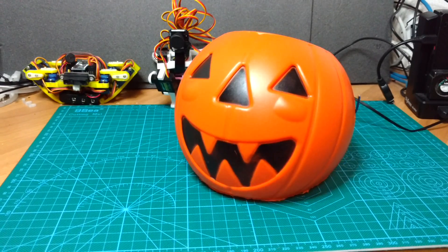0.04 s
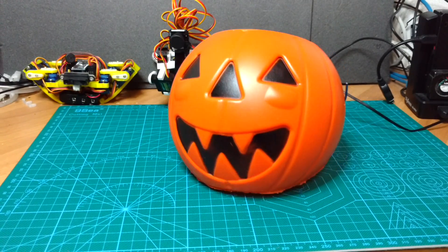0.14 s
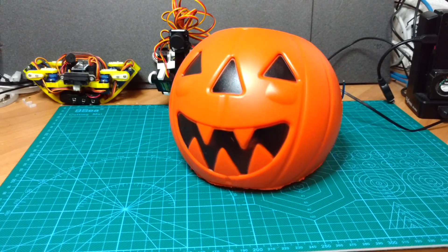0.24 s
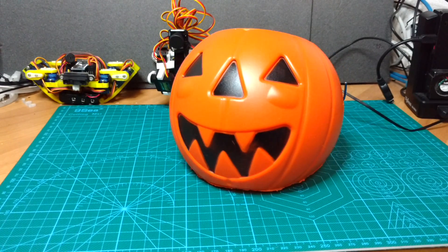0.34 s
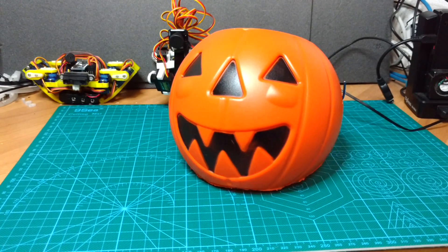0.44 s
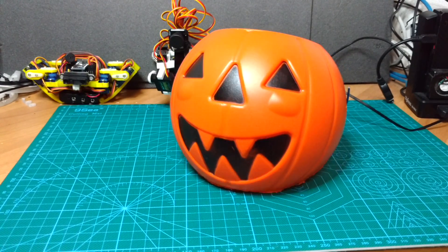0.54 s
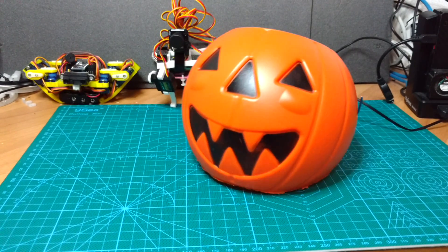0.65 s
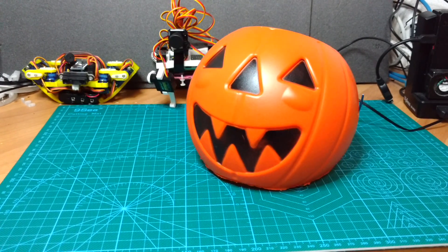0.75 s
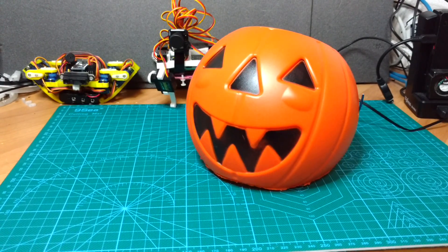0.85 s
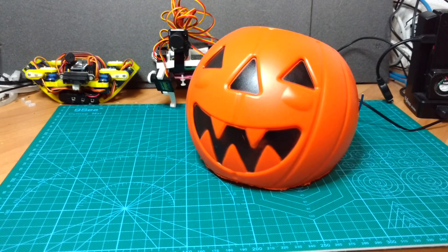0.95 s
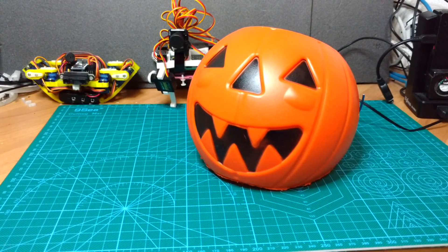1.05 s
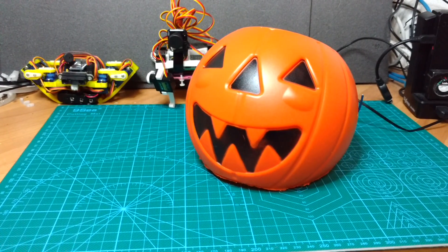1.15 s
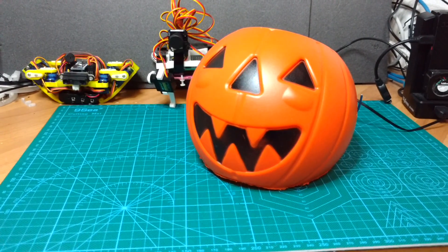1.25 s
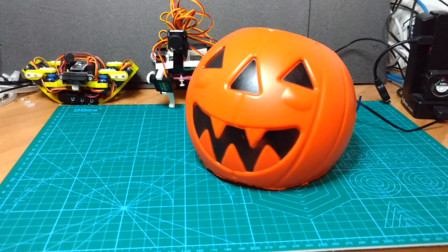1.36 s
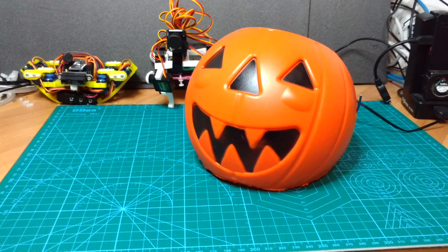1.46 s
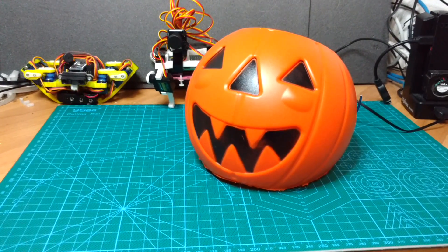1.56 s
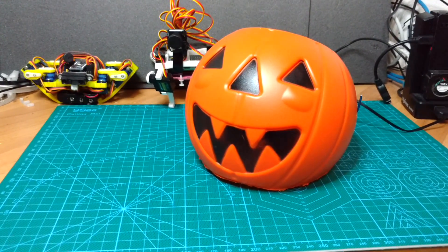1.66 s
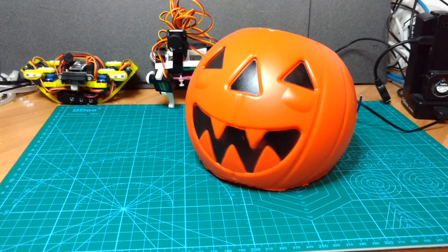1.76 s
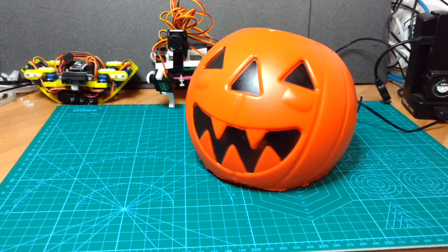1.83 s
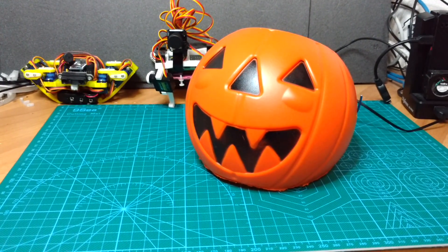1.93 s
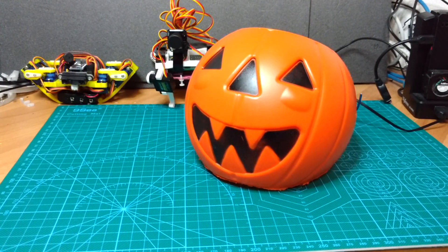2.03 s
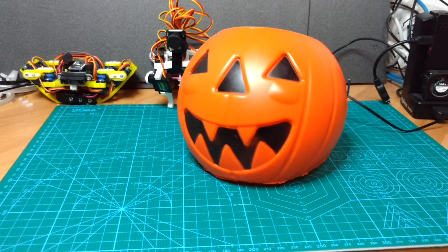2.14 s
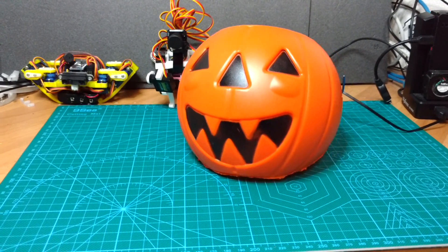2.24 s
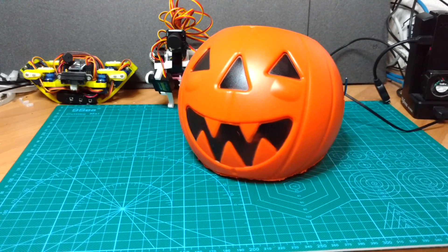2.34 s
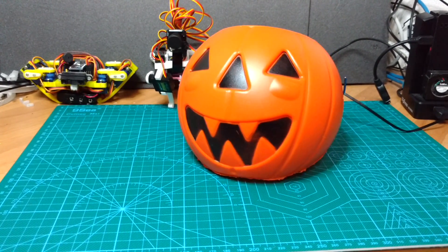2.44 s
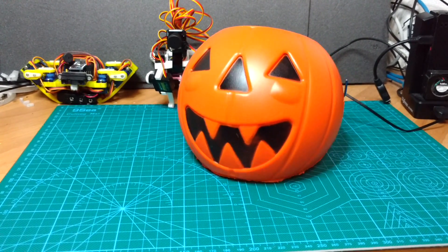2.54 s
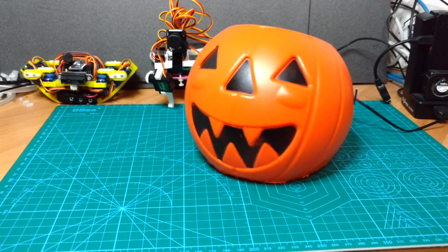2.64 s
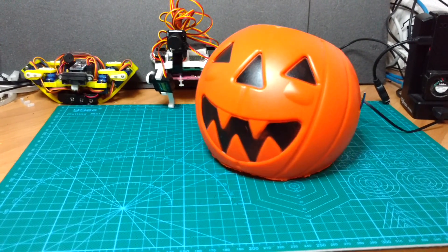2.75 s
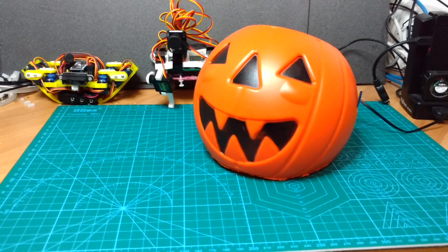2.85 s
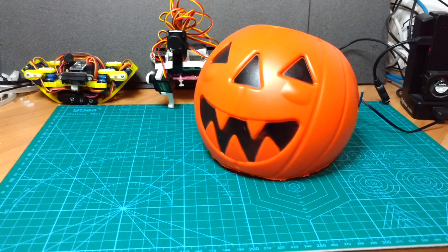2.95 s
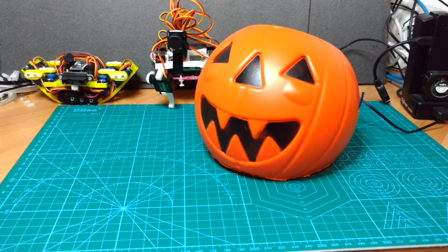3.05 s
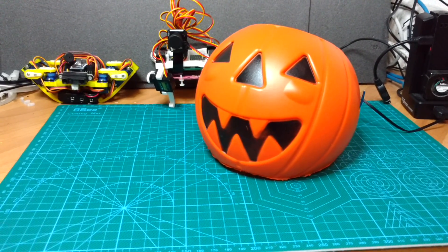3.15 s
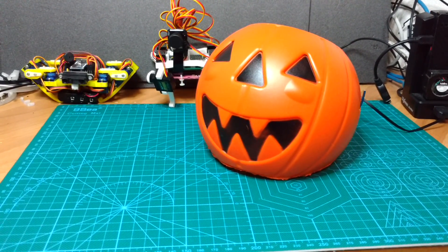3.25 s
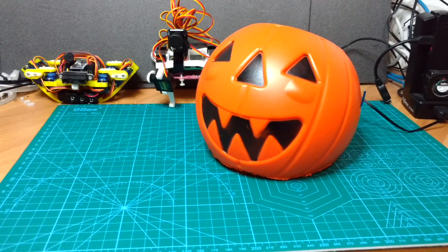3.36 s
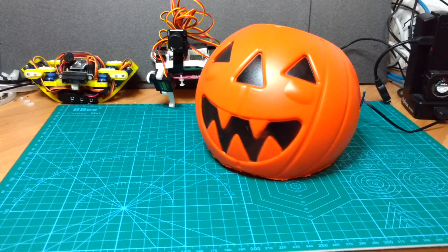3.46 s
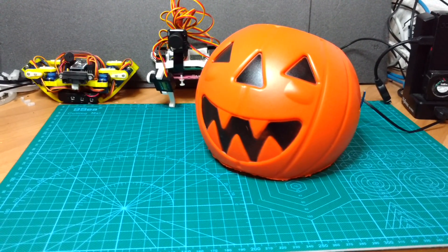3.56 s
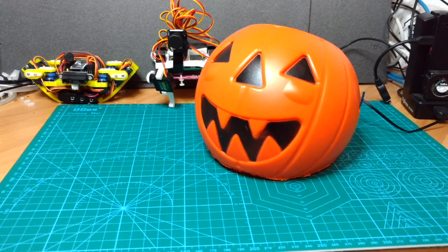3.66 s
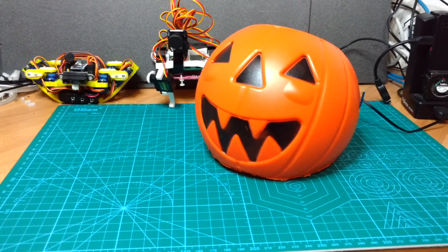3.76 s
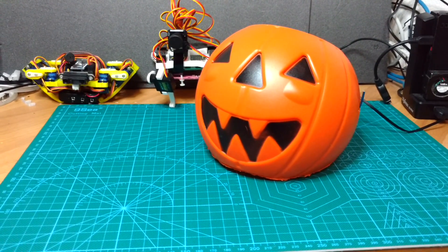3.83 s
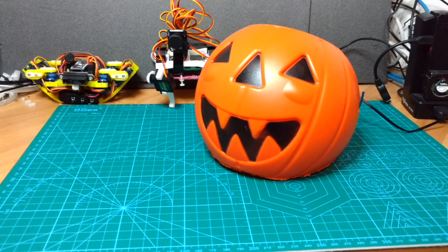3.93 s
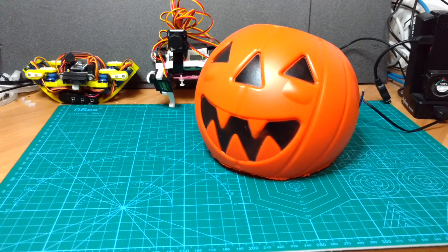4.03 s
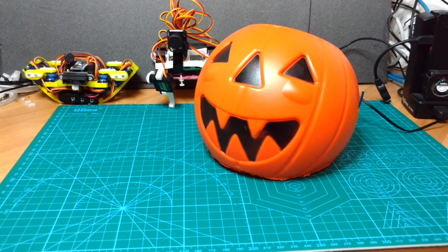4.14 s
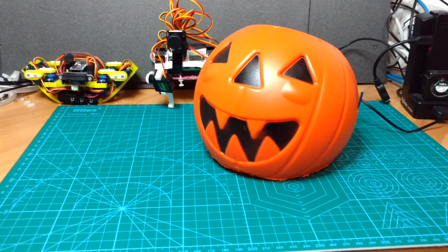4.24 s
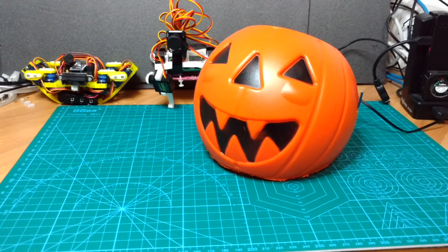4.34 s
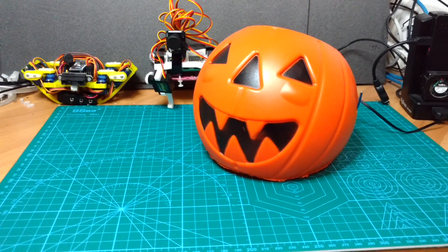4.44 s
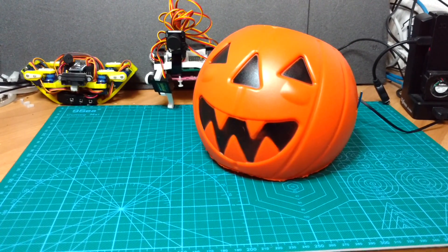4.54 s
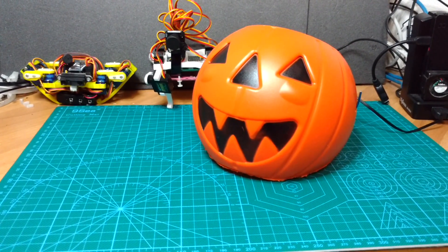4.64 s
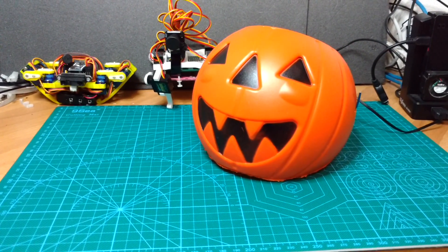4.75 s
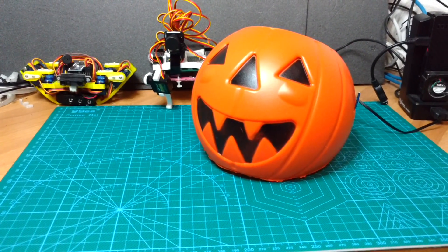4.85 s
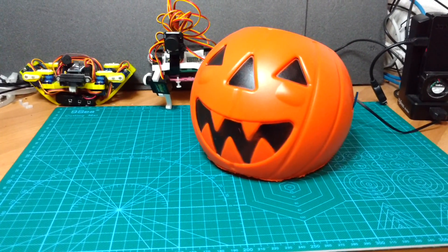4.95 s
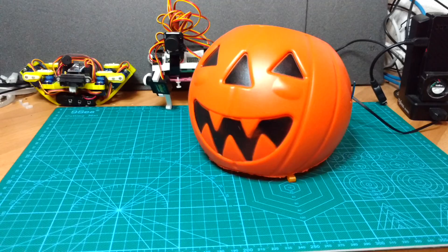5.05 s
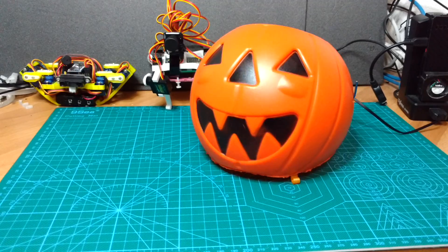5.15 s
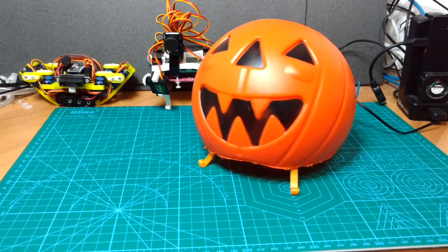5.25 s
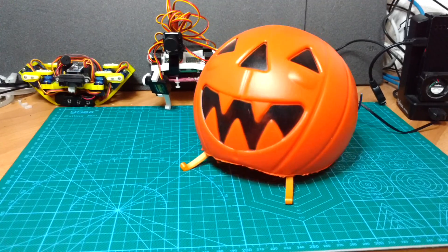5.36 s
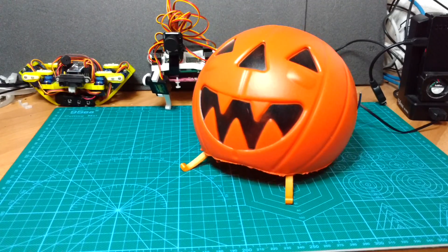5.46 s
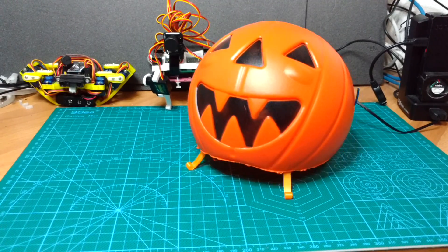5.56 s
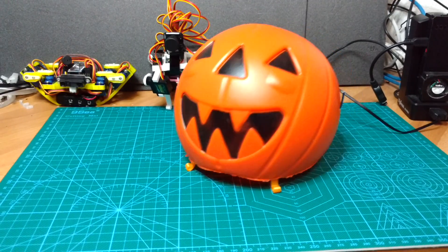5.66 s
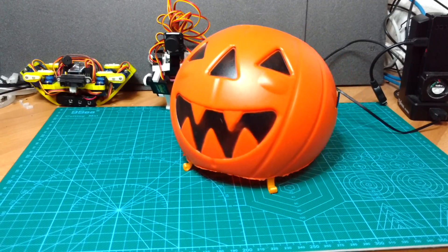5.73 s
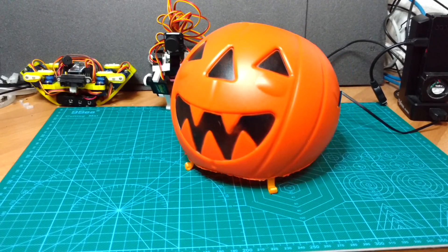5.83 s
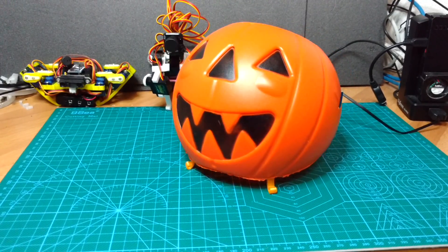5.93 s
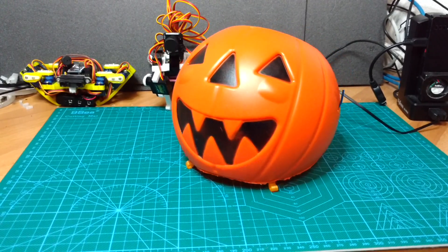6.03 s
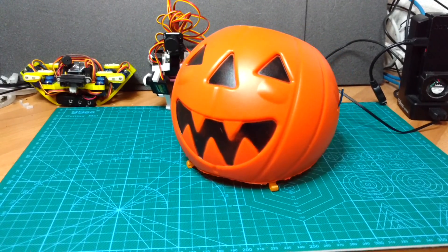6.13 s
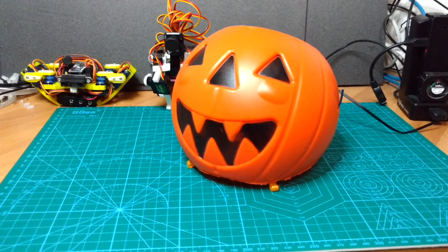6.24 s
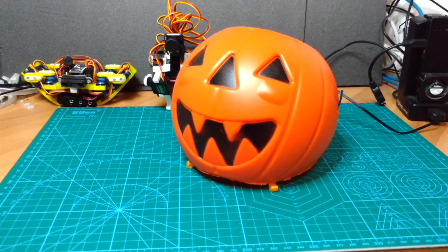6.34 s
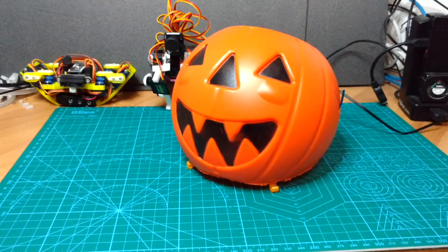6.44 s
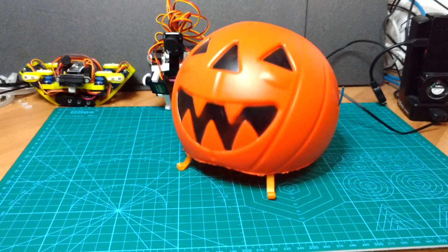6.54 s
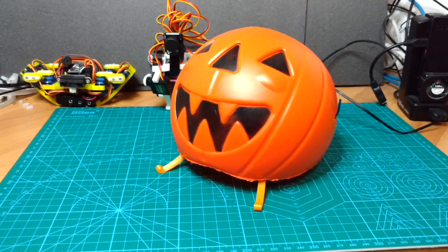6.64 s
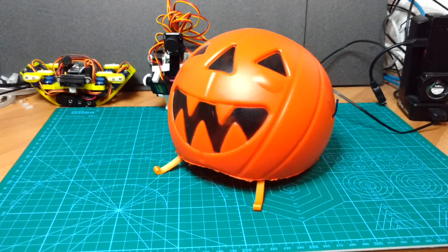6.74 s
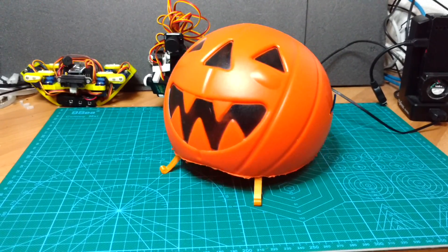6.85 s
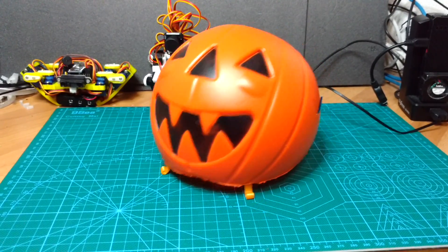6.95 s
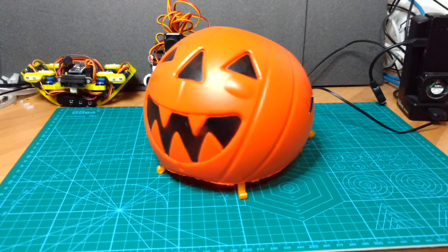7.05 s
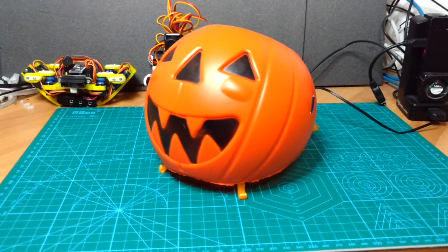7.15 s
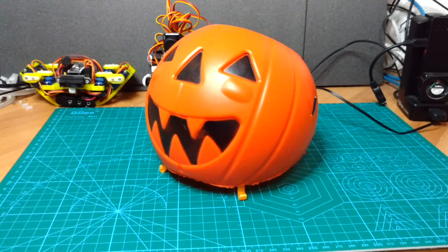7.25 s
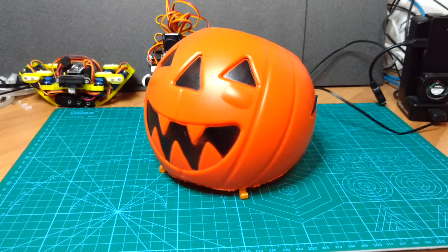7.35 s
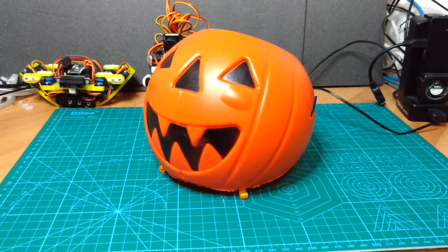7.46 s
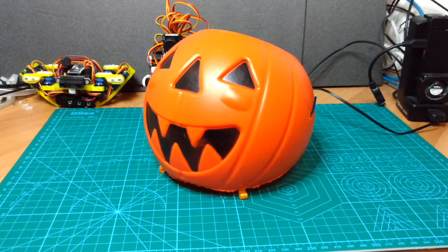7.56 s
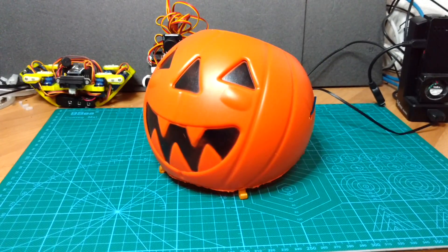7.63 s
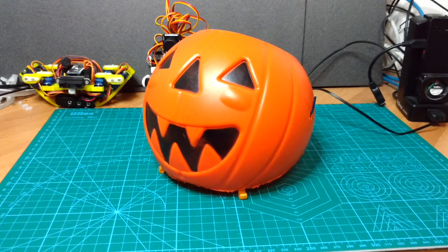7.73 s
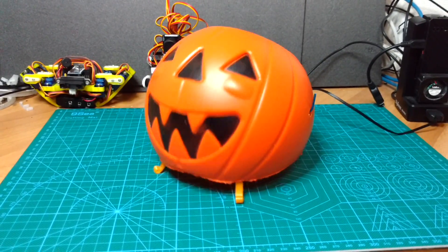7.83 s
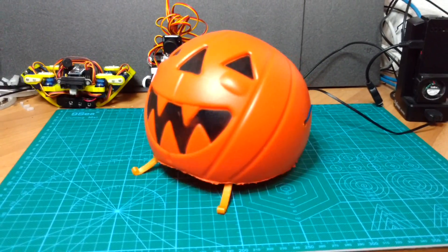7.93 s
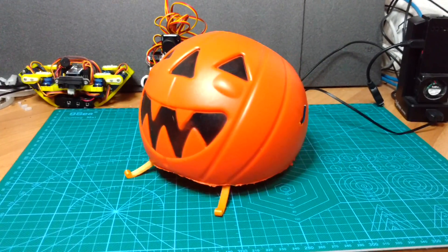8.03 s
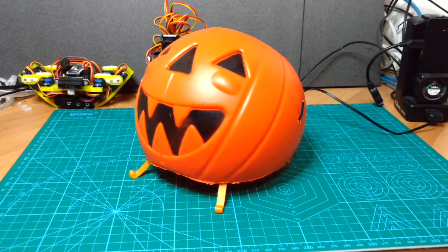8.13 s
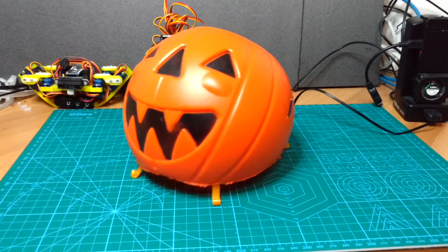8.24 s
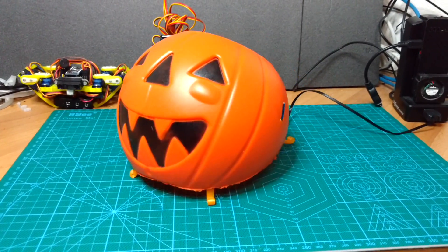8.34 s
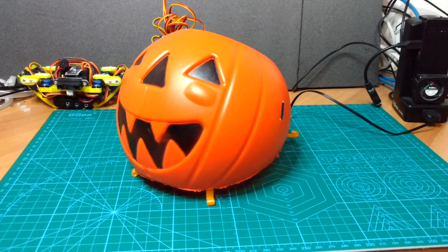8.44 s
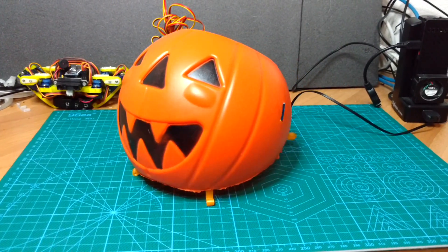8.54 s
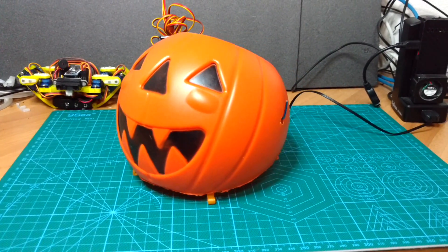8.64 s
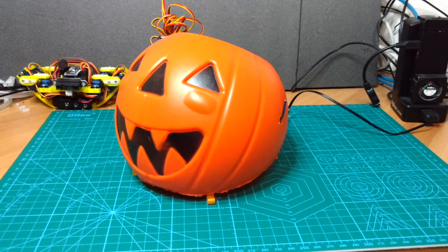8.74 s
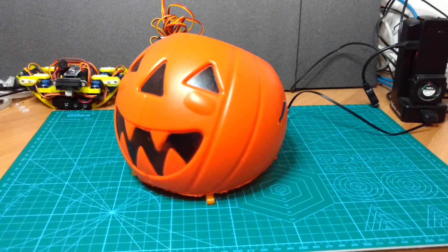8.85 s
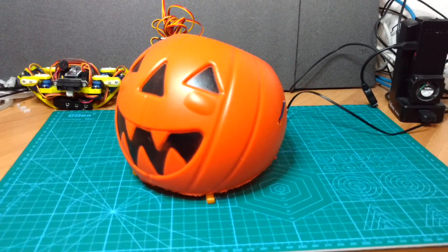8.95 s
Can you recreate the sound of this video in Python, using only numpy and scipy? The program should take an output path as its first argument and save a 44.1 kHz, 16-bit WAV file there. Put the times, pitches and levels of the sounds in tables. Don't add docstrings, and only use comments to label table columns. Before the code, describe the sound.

On a workbench, small geared motors give paired short zips, each shaking a hollow plastic shell and the desk. Sharp light key clicks follow in a quick patter. After a stutter of rim squeaks, three bursts of bright gear whir and coarse grind come with hard plastic knocks and rattle, each ending in a soft servo buzz and tiny tick. Constant soft fan noise, faint distant cricket, close wide stereo microphones.

```python
import sys
import numpy as np
from scipy import signal
from scipy.fft import rfft, irfft, next_fast_len
from scipy.io import wavfile
from scipy.ndimage import uniform_filter1d

SR = 44100
rng = np.random.default_rng(int(sys.argv[2]) if len(sys.argv) > 2 else 0)


def gain_from_db(level_db):
    decades = np.asarray(level_db, float) / 20
    return 10 ** decades


def file_out(sig):
    cols = np.atleast_2d(sig).T
    lim = np.clip(cols, -1, 1)
    pcm = np.round(lim * 32767).astype(np.int16)
    wavfile.write(sys.argv[1], SR, pcm)


N = 396459

# mode_hz, width_hz, level_db
SHELL_MODES = [(484, 36, -3), (588.5, 48, 0.5), (741, 110, 1.5), (866, 73, -1), (998, 92, 2),
               (1210, 150, 0), (1360, 81, 2.5), (1480, 89, 2.5), (1680, 76, -6.5), (1866, 44, -9.5)]
# freq_hz, level_db
PLASTIC = [(500, -11), (1500, -21), (3000, 2), (5000, -2), (7500, -21.5)]
# low_hz, high_hz
BAND_HZ = [125, 15550]


def evened(x):
    return x / np.sqrt(np.mean(x ** 2) + 1e-20)


def peaked(x):
    return x / abs(x).max()


def read(points, hz):
    f, value = np.transpose(points)
    return np.interp(np.log(hz + 1), np.log(f + 1), value)


def colour(x, points):
    n = x.shape[-1]
    size = next_fast_len(n)
    gain = gain_from_db(read(points, np.fft.rfftfreq(size, 1 / SR)))
    return irfft(rfft(x, size) * gain, size)[..., :n]


def add(mix, start_s, sound):
    part = mix[round(start_s * SR):][:len(sound)]
    part += sound[:len(part)]


def resonate(x, hz, width_hz):
    return signal.lfilter(*signal.iirpeak(hz, hz / max(width_hz, 5.), SR), x)


def wander(n, per_s):
    knots = rng.standard_normal(2000)
    return np.interp(np.arange(n) * per_s / SR, np.arange(len(knots)), knots)


def clicks(per_s, spread_db):
    size = gain_from_db(spread_db * np.minimum(rng.exponential(1, N), 5)) * rng.choice([-1., 1.], N)
    return evened(size * (rng.random(N) < per_s / SR))


def burst(t60_s, rise_s):
    t = np.arange(3000) / SR
    return rng.standard_normal(3000) * gain_from_db(-60 * t / t60_s) * (1 - np.exp(-t / rise_s))


def body(drive, modes, sway_db, per_s):
    total = np.zeros(N)
    for hz, width_hz, db in modes:
        total += gain_from_db(db + sway_db * wander(N, per_s)) * resonate(drive, hz, width_hz)
    return evened(total)


def fan():
    # freq_hz, density_db_per_hz
    air_spectrum = [(25, -100), (60, -87), (130, -85), (250, -90), (500, -91.5), (1200, -94), (3000, -88.5),
                    (4300, -93.5), (5500, -99), (8000, -103), (13000, -109), (16000, -118)]
    # freq_hz, level_db
    air_apart = [(30, -20), (120, 1), (500, -1.5), (1200, -3), (2500, -0.5), (6000, 0.5), (15000, -1)]
    noise = rng.standard_normal((2, N)) * np.sqrt(SR / 2)
    air = colour(noise, air_spectrum) * gain_from_db(0.87 * wander(N, 6))
    return np.array([air[0], colour(air[1], air_apart)])


def cricket():
    turns = np.cumsum(34.0 * (1 + 0.023 * wander(N, 4.1))) / SR
    gate = np.exp(-((turns % 1 - .5) / 0.16) ** 2) * gain_from_db(4.6 * wander(N, 28))
    song = resonate(resonate(rng.standard_normal(N), 7200, 350), 7200, 350)
    return gain_from_db(-66) * evened(gate * song)


def key(start_s, peak_db, thud_db, fizz_db, ring_hz):
    blow = burst(0.012, 0.0003) + gain_from_db(5) * burst(.0015, 0.00005) + gain_from_db(-8.5) * burst(0.071, 0.00082)
    tick = peaked(colour(blow, PLASTIC)) + gain_from_db(-6.5) * peaked(resonate(blow, ring_hz, 520))
    fizz = resonate(blow, 7100, 3100)
    landing_s = 0.00152
    thud = np.roll(resonate(blow, 944, 550), round(landing_s * SR))
    sound = peaked(tick) + gain_from_db(thud_db + 2.5) * peaked(thud) + gain_from_db(fizz_db + 5.5) * peaked(fizz)
    return start_s, gain_from_db(peak_db - 3.0) * sound


def hold(start_s, end_s, buzz_db, hum_db, tick_db):
    frames_hz, pulse_s = 49.9, 0.012
    t = np.arange(round((end_s - start_s) * SR)) / SR
    n = len(t)
    kick = (np.diff(t * frames_hz % 1, prepend=1) < 0) * gain_from_db(3.2 * wander(n, 38.9))
    on = np.convolve(kick, np.hanning(round(pulse_s * SR)))[:n]
    buzz = evened((on + .2) * np.sin(2 * np.pi * 1000 * t + .6 * wander(n, 70)))
    shake = kick + 0.014 * rng.standard_normal(SR)[:n]
    hum = evened(resonate(resonate(shake, 248, 54), 248, 54))
    hiss = on * rng.standard_normal((2, SR))[:, :n]
    tick = evened(resonate(hiss[0], 4100, 400) + resonate(hiss[1], 4960, 1300))
    sound = gain_from_db(buzz_db) * buzz + gain_from_db(hum_db) * hum + gain_from_db(tick_db) * tick
    return start_s, sound * signal.windows.tukey(n, .06)


def squeak(start_s, length_s, grip_hz, grip_db, grip_octave_db):
    grip_at, slip_db, slip_rise = .45, -13, 0.0427
    t = np.arange(0, length_s, 1 / SR)
    n = len(t)
    slip = np.interp(t / length_s, [0, grip_at, 1], [1, 0, 1])
    hz = grip_hz * (1 + slip_rise * slip)
    first_db = grip_db + slip_db * slip
    octave_db = grip_octave_db + slip_db * slip
    turn = 2 * np.pi * np.cumsum(hz * (1 + 0.027 * wander(n, 157.5))) / SR
    upper = sum(gain_from_db(-2.5 * k) * np.cos(k * turn) for k in range(4, 8))
    tone = gain_from_db(first_db + 10.5) * (np.cos(turn) + upper)
    tone += gain_from_db(octave_db + 5.0) * np.cos(2 * turn + 1)
    return start_s, tone * gain_from_db(4.5 * wander(n, 132)) * signal.windows.tukey(n, .2)


def knock(start_s, peak_db, ring_hz, treble_db):
    blow = burst(.04, 0.00033)
    neighbours = sum(gain_from_db(db) * resonate(blow, hz, width_hz) for hz, width_hz, db in SHELL_MODES)
    ring = resonate(blow, ring_hz, 81) + gain_from_db(-17) * neighbours
    crack = peaked(colour(blow, PLASTIC))
    return start_s, gain_from_db(peak_db + 2.0) * (peaked(ring) + gain_from_db(treble_db) * crack)


def lurch(peak_s, db, fall_s):
    loading = 0.95
    t = np.arange(-3 * fall_s * loading, 3 * fall_s, 1 / SR)
    t = t[t > -peak_s]
    return peak_s + t[0], gain_from_db(db - 20 * np.maximum(t, -t / loading) / fall_s)


def stroke(powered_s, whir_db, sag_db, grind_db, coast_db_per_s):
    spin_up_s, standstill_db, engage_s = 0.017, -18.5, .011
    grind_sag_db = -4.5
    t = np.arange(0, powered_s + 50 / coast_db_per_s, 1 / SR)
    done = np.minimum(t / powered_s, 1)
    speed_db = whir_db + sag_db * done + standstill_db * np.exp(-t / spin_up_s)
    speed_db -= coast_db_per_s * np.maximum(t - powered_s, 0)
    bite = np.minimum(t / engage_s, 1) * gain_from_db(speed_db)
    return bite, bite * gain_from_db(grind_db + grind_sag_db * done)


def effort():
    # start_s, powered_s, whir_db, sag_db, grind_db (against whir)
    twitches = [
        (0.017, .14, -28, -5.5, -6.5),
        (0.494, 0.24, -29, -15.5, -6.5),
        (2.042, 0.15, -27, -7.5, -5),
        (2.536, 0.24, -29.5, -14, -5.5),
        (4.955, .15, -32.5, -2.5, 2),
    ]
    # start_s, effort_db
    strides = [
        (5.199, 0.14),
        (6.495, 0.067),
        (7.799, 0.079),
    ]
    # offset_s, powered_s, whir_db, sag_db, grind_db (against whir)
    stride_strokes = [
        (.001, 0.22, -27.5, -3.5, -3),
        (0.255, 0.31, -28.5, 0.35, -2.5),
        (0.598, .11, -39.5, -1.8, -4),
        (0.75, .17, -33.5, 3, -7),
    ]
    # peak_s, rattle_db, rumble_db, fall_s (20 dB)
    lurches = [(.104, -20, -30, 0.0264), (.17, -42, -38.5, .1), (0.532, -39.5, -46, .12),
               (.63, -49, -44, 0.17), (.748, -44.5, -52, 0.05), (2.128, -19, -29.5, 0.0332),
               (2.2, -43, -46, 0.15), (2.571, -40, -51, 0.0868), (2.677, -61, -42.5, 0.2),
               (2.76, -46, -51.5, 0.12), (5.046, -27.5, -44.5, 0.08), (5.321, -25, -38, 0.1347),
               (5.718, -25, -47, 0.0753), (5.814, -33.5, -52, 0.07), (6.031, -27, -36.5, 0.0646),
               (6.575, -29, -38.5, 0.06), (6.684, -31.5, -43.5, .08), (7.002, -23.5, -45, 0.0845),
               (7.118, -37.5, -54, 0.17), (7.338, -29, -41, 0.04), (7.46, -52, -54.5, .05),
               (7.836, -32.5, -45, .15), (7.97, -25.5, -40.5, 0.14), (8.309, -26.5, -44, 0.11),
               (8.44, -36.5, -50, 0.07), (8.653, -26.5, -38, .05), (8.772, -71, -52, 0.1)]
    twitch_coast, stride_coast = 264, 420
    linger = 1.42
    awake_db, calm_s = -43, 0.099
    shake_db, drone_db = -2, -23.5

    whir, grind, rattle, rumble = np.zeros((4, N))
    played = [(*row, twitch_coast) for row in twitches]
    for start_s, effort_db in strides:
        for at_s, powered_s, db, sag_db, grind_db in stride_strokes:
            played.append((start_s + at_s, powered_s, db + effort_db, sag_db, grind_db, stride_coast))
    for start_s, *shape in played:
        fast, slow = stroke(*shape)
        add(whir, start_s, fast)
        add(grind, start_s, slow)
    for peak_s, rattle_db, rumble_db, fall_s in lurches:
        add(rattle, *lurch(peak_s, rattle_db, fall_s))
        add(rumble, *lurch(peak_s, rumble_db, fall_s * linger))
    keep = np.exp(-1 / (calm_s * SR))
    recent = signal.lfilter([1 - keep], [1, -keep], whir + 1e-9)
    awake = np.minimum(recent / gain_from_db(awake_db), 1)
    return whir, grind, awake * rattle + gain_from_db(shake_db) * grind, awake * rumble + gain_from_db(drone_db) * grind


def moves(levels):
    # freq_hz, level_db
    fast_gears = [(3500, -22.5), (4800, 1.5), (6200, 1), (8500, -5.5), (11000, -7.5), (14000, -15),
                  (16000, -21)]
    # mode_hz, width_hz, level_db
    case_modes = [(5070, 850, -8), (6340, 630, -6.5), (7145, 280, 8), (9120, 1400, 0), (10800, 3800, -50)]
    # freq_hz, level_db
    slow_gears = [(1200, -9), (2300, -5), (3200, 2), (4000, 3), (4800, 2), (6500, -20)]
    # mode_hz, width_hz, level_db
    desk_modes = [(142.8, 35, 2.5), (185.2, 90, -2), (249, 14, 5), (360, 104, -40)]
    teeth = clicks(4000, spread_db=3.0) * gain_from_db(2.06 * wander(N, 150) + 1.46 * wander(N, 40))
    case = body(teeth, case_modes, sway_db=7, per_s=25)
    whir = evened(evened(colour(teeth, fast_gears)) + gain_from_db(-3) * case)
    slow_teeth = clicks(3000, spread_db=2) * gain_from_db(3.05 * wander(N, 80))
    grind = evened(colour(slow_teeth, slow_gears))
    rattle = body(clicks(1200, spread_db=3.5), SHELL_MODES, sway_db=5, per_s=30)
    rumble = body(clicks(1200, spread_db=3), desk_modes, sway_db=4.0, per_s=13)
    gains = gain_from_db([1.5, 1.5, -3.5, 6.0])
    return sum(g * level * layer for g, level, layer in zip(gains, levels, (whir, grind, rattle, rumble)))


def room(x):
    # freq_hz, t60_s
    decay = [(200, 0.157), (1000, 0.13), (4000, 0.04), (12000, 0.15)]
    # freq_hz, level_db
    apart = [(30, -11), (120, -16.5), (500, -14), (1200, -1), (2500, -2), (6000, -2), (15000, 0.5)]
    taps = np.zeros((2, SR // 3))
    at = np.arange(40, SR // 3 - 20, 20) + rng.integers(0, 20, (2, (SR // 3 - 41) // 20))
    np.put_along_axis(taps, at, rng.choice([-1., 1.], at.shape), 1)
    hz, t, z = signal.stft(taps, SR, nperseg=128)
    t60_s = np.maximum(read(decay, hz), .02)[:, None]
    tail = signal.istft(z * gain_from_db(-60 * t / t60_s), SR, nperseg=128)[1]
    tail = gain_from_db(-9.5) * tail / np.linalg.norm(tail[0])
    tail[0, 0] += .9
    tail[1, 4] += .9
    both = signal.oaconvolve(x, tail, axes=1)[:, :N]
    return np.array([both[0], colour(both[1], apart)])


def scene():
    # start_s, peak_db, ring_hz, treble_db (against peak)
    knocks = [(0.3, -30, 497, -30), (0.312, -36, 170, -35), (0.708, -45.5, 1280, -10),
              (0.734, -31, 1290, -14), (2.724, -29, 988, -16), (3.111, -41, 410, -21),
              (5.032, -19.5, 790, 3.5), (5.309, -20, 586, -11), (5.358, -16.5, 830, -7),
              (5.71, -14, 1435, -17), (5.813, -30.5, 1000, 2), (6.027, -19, 760, -19),
              (6.044, -19.5, 1680, -14.5), (6.516, -25.5, 1330, -1), (6.908, -19, 736, 1.5),
              (6.992, -13, 1180, -2.5), (7.009, -22.5, 940, -15), (7.121, -24, 815, -5),
              (7.29, -17.5, 1760, -3.5), (7.331, -24.5, 824, -2), (7.822, -15, 710, 1),
              (7.923, -14, 1480, -29), (7.96, -14.5, 1450, 0.5), (8.234, -16, 1780, -14),
              (8.301, -17, 1400, -9), (8.433, -17, 1680, -5.5), (8.569, -31, 785, 5.5),
              (8.635, -20, 743, -7), (7.585, -39.5, 640, -20), (8.885, -37, 169, -17)]
    # start_s, end_s, buzz_db, hum_db, tick_db
    holds = [
        (.356, 0.506, -64.5, -60, -60),
        (0.796, 1.038, -57, -56, -60),
        (2.308, 2.514, -62.5, -60, -58.5),
        (2.817, 3.091, -57.5, -53.5, -58),
        (6.062, 6.3, -59, -52.5, -60),
        (6.3, 6.502, -56.5, -67, -58),
        (7.509, 7.791, -66, -59, -60),
        (8.812, 8.99, -66, -58, -62),
    ]
    # start_s, length_s, pitch_hz, level_db, octave_db
    squeaks = [
        (.068, 0.053, 711, -30.5, -26.5),
        (0.517, 0.052, 693, -34.5, -56),
        (2.092, 0.046, 720.4, -30, -30.5),
        (2.563, 0.035, 727, -38.5, -51),
        (4.988, 0.026, 760, -30, -28),
        (5.015, .044, 754, -28, -28),
        (5.058, 0.0484, 736, -31, -35),
    ]
    # start_s, peak_db, thud_db, fizz_db (against peak)
    keys = [(1.009, -44, -17, -1), (1.734, -33, -1, -21), (1.9068, -28.5, -1.5, -42),
            (2.003, -16.5, -12.5, -9.5), (2.302, -34, -16, -27), (3.3468, -29.5, -9.5, -20),
            (3.3843, -31, -8, -20), (3.4321, -42, -1, -20), (3.5488, -29.5, -3, -31), (3.5843, -39, 2, -24),
            (3.6656, -36.5, -5, -23), (3.7492, -22, -4, -13.5), (3.8255, -30.5, -3, -23),
            (3.901, -30.5, 0.6, -31), (3.9709, -34, -4.5, -28), (4.067, -29, 0, -28),
            (4.151, -33, -6.5, -24), (4.2423, -35.5, -2, -29), (4.3348, -31, -3, -9),
            (4.345, -23, -4.5, -12), (4.839, -49, 4, -21), (4.8618, -49, 11.5, -26),
            (4.9022, -37, -10, -20), (4.9102, -24.5, -10, -6)]
    pings = [
        (1.5542, -29, 0.7, -29),
        (3.677, -29, -13, -24),
        (3.844, -33, -4, -10),
        (3.9944, -33.5, -14, -20),
        (4.1647, -33, -10, -19),
    ]
    settles = [
        (6.259, -33.5, -23, 1),
        (7.561, -33, -8, 2.5),
        (8.8638, -32, -8.5, -0.5),
    ]
    key_hz, ping_hz = 3470, 6000

    near, levels = cricket(), effort()
    for source, table in ((knock, knocks), (hold, holds), (squeak, squeaks)):
        for row in table:
            add(near, *source(*row))
    for table, ring_hz in ((keys, key_hz), (pings + settles, ping_hz)):
        for row in table:
            add(near, *key(*row, ring_hz))
    left = moves(levels) / np.sqrt(2)
    right = moves(levels) / np.sqrt(2)
    close = room(np.array([near + left + right, near + left - right]))
    low_cut = signal.butter(4, BAND_HZ[0], "high", fs=SR, output="sos")
    mid, side = signal.sosfilt(low_cut, close) + fan()
    return np.array([mid + side, mid - side])


def top_cut(x):
    return signal.sosfilt(signal.butter(12, 16470, fs=SR, output="sos"), x)


def record(dry):
    # freq_hz, level_db
    cross = [(3500, -4), (5000, -4), (7500, -3.5), (10000, -2), (12500, 2), (14500, -14)]
    # freq_hz, margin_db
    dropped = [(700, -30), (1200, -11), (2500, -7.5), (3900, -9), (4400, -18), (5000, -10), (7500, -14),
               (10000, -11), (12500, -12)]
    cross_s = 0.0004044
    sum_diff = np.array([dry[0] + dry[1], dry[0] - dry[1]]) / 2
    hz, t, z = signal.stft(sum_diff, SR, nperseg=2048)
    echo = gain_from_db(np.minimum(read(cross, hz), 0)) * np.exp(-2j * np.pi * hz * cross_s)
    comb = np.array([1 - echo, 1 + echo]) / np.sqrt(1 + abs(echo) ** 2)
    z = z * (comb * (hz < BAND_HZ[1]))[..., None]
    power = uniform_filter1d(abs(z) ** 2, size=12, axis=1)
    loud_db = 10 * np.log10(power.sum((0, 1)) + 1e-12) + 45
    margin_db = read(dropped, hz)[:, None] + .2 * loud_db * np.sign(4500 - hz)[:, None]
    z = z * (power > power[::-1] * gain_from_db(2 * margin_db))
    mid, side = signal.istft(z, SR, nperseg=2048)[1][:, :N]
    return top_cut(np.array([mid + side, mid - side]))


dry = scene()
out = record(dry)
file_out(out)
```